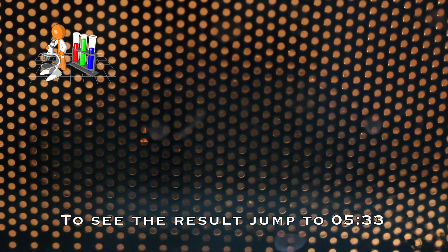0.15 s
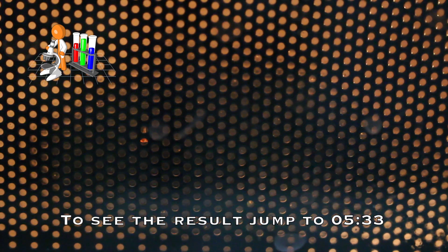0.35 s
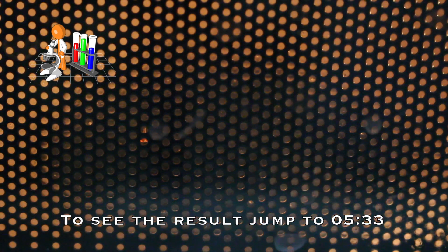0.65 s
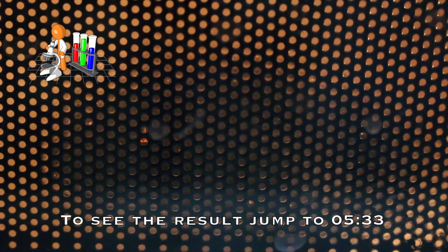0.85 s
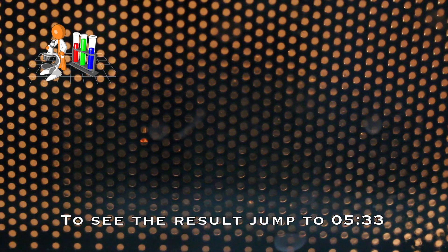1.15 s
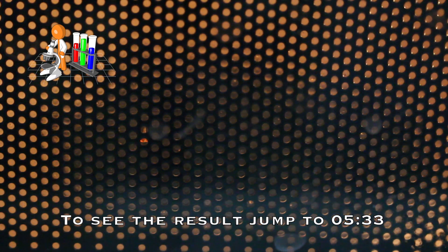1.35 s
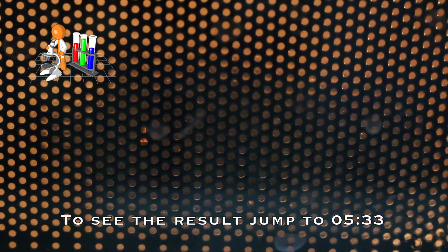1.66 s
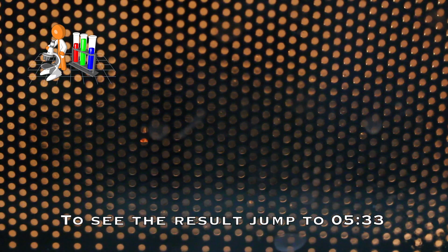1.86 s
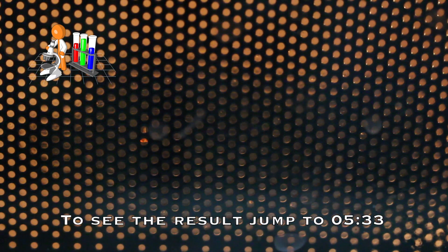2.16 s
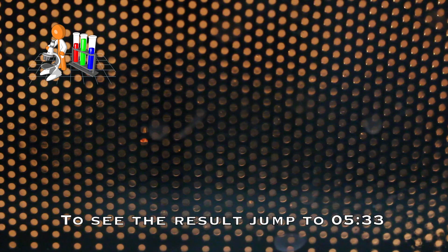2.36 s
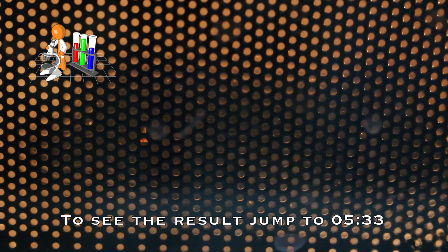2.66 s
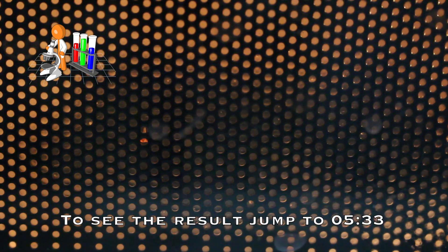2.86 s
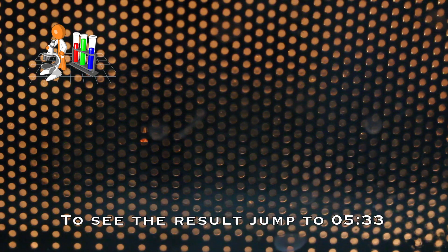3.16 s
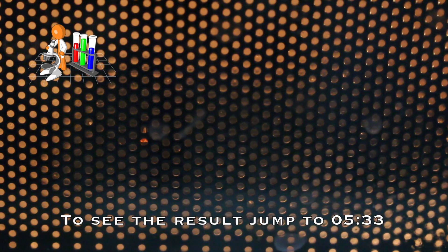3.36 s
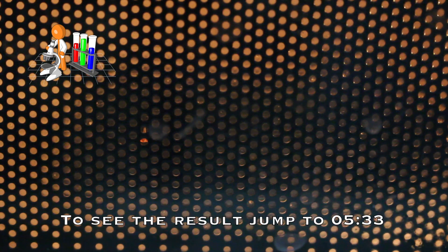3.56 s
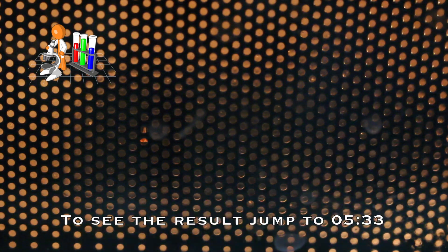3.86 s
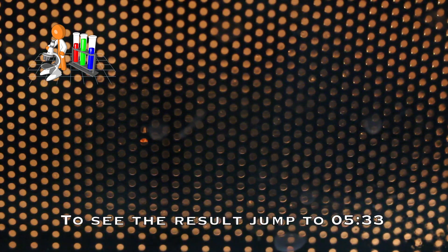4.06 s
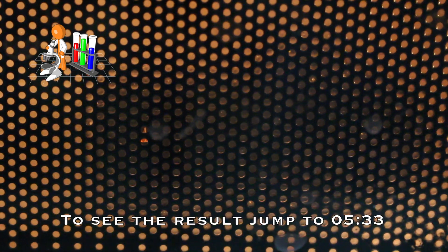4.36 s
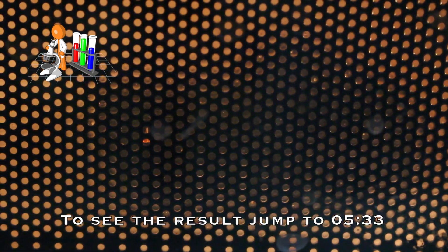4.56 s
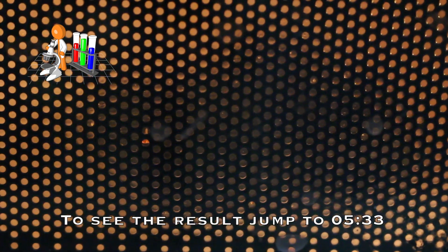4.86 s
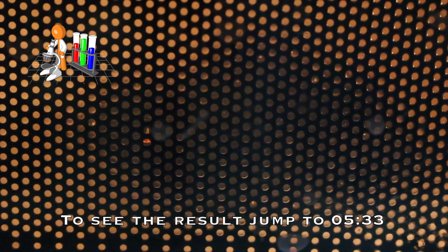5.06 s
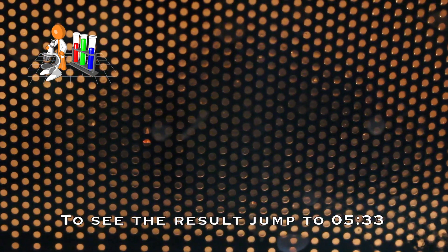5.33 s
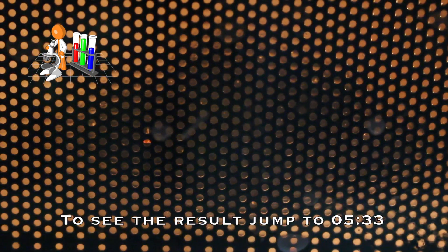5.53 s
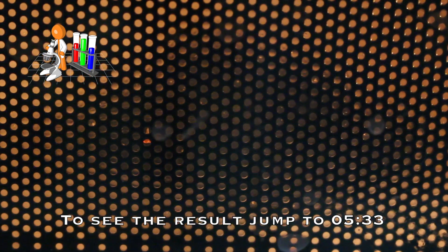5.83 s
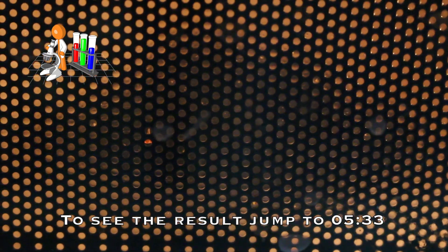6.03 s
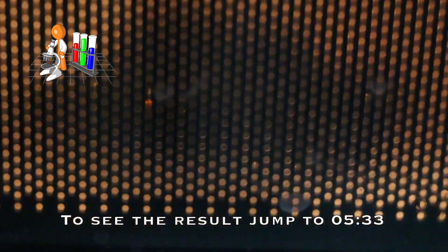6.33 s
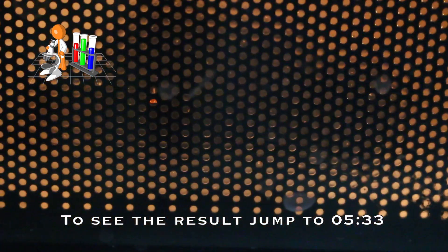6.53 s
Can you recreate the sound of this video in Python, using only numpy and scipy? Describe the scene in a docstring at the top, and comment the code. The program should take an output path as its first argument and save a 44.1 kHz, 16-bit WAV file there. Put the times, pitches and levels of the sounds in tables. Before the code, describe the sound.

A microwave oven is already running at 0 seconds and continues to the end, about 6.6 seconds, heard in stereo from right at its door. A deep mains hum with buzzing overtones throbs four to five times a second against the motor's tone, the throb slowly growing deeper and shallower. The fan whirs in steady low blade tones, with a wavering whistle near 935 hertz and a dull, boxy rush of air. Very faint, rapid high ticks from the turntable drive come in clusters. Around 5 seconds the whistle swells modestly, then recedes. From 5.8 to 6.3 seconds an extremely faint, narrow hiss of vapour glides upward and back down. At about 6.37 seconds several contacts within milliseconds merge into one loud, sharp snap against the door, with a quickly damped metallic ring and a short kitchen tail. The hum continues underneath.

```python
"""A microwave oven runs, heard from right at its door. From the start the transformer hums on the mains and
throbs against a motor turning just under mains speed; the fan whirs as blade tones over a rush of air, and
the turntable drive ticks faintly. Around 5 s the fan's whistle swells. At 5.8 s a thin jet of vapour hisses,
its pitch rising and falling with pressure. At about 6.4 s something snaps sharply against the door:
a few quick contacts make it ring, with a short tail from the kitchen."""
import sys
import numpy as np
from scipy import signal
from scipy.fft import rfft, irfft, next_fast_len
from scipy.io import wavfile
from scipy.ndimage import map_coordinates

SR = 44100
rng = np.random.default_rng(int(sys.argv[2]) if len(sys.argv) > 2 else 0)


def transcribe(u):
    """Save the signal u as a 16-bit wav file named by the first command-line argument.

    u: samples, shape (n,) or (channels, n), limited to [-1, 1]; the rate is SR.
    q: integer samples, one column per channel.
    """
    v = np.clip(np.atleast_2d(u).T, -1, 1)
    q = np.round(v * 32767).astype(np.int16)
    wavfile.write(sys.argv[1], SR, q)


N = 295029
TIME = np.arange(N) / SR  # seconds

MAINS_HZ, MOTOR_HZ, FAN_HZ = 59.97, 57.71, 46.773  # mains cycles, motor turns and fan turns a second
GEAR_HZ = 18.6  # turns a second of a gear in the turntable drive
THROB_LOW_S = 0.04  # a moment when the main hum and the motor's throb oppose each other
THROB_DB = -27.5  # mean rms of the motor's tone at twice its turning rate
SAG_S, SAG_PERIOD_S = 1.74, 1.7  # a moment when that tone is weakest, and the time between such moments
SAG_DB, RIPPLE_DB = 1.5, 0.8  # depth either way of the sag, and of a ripple that adds a lesser dip halfway
WHISTLE_DB, WHISTLE_RISE_DB = -47.5, 4  # the fan's 20th multiple: usual rms, and its one swell
WHISTLE_CREST_S, WHISTLE_WIDTH_S = 5.0, 0.9  # middle and half width of that swell
JET_START_S, JET_LENGTH_S, JET_DB = 5.8, 0.49, -64  # the puff of vapour, with its rms at full pressure
JET_LOW_HZ, JET_RISE_HZ = 8300, 3600  # its pitch at no pressure, and the rise at full pressure
TOP_HZ = 15720  # upper edge of the sound

# Tones of the transformer: (multiple of the mains, level/dB rms, left over right/dB)
HUM_TONES = [(1, -56, -1.2), (2, -28.5, -1.5), (3, -43.5, -0.5), (4, -29.5, -1.2), (5, -55.5, 2.5),
             (6, -32, -1), (8, -38.5, 0), (10, -44.5, -3.5), (12, -48.5, 5.5), (14, -53.5, 11.5),
             (16, -59.5, -4), (18, -51, -3.5), (20, -54.5, 4.5), (22, -52.5, 1), (26, -51, 3),
             (28, -54.5, 3.5), (49, -67, -4.5), (77, -81.5, 3.5)]
# Colour of the buzzing sheet metal: (f/Hz, relative level/dB)
BUZZ_COLOUR = [(600, -39), (1200, -10.0), (2600, -1.0), (4000, -5), (6000, -13.5), (10000, -38.5)]
# Strength of the motor's shake, once a turn: (t/s, level/dB rms)
MOTOR_SHAKE = [(0.0, -44), (0.86, -50), (1.08, -35), (2.64, -42), (2.7, -52), (2.87, -37), (3.37, -34),
               (4.04, -41), (4.1, -49), (4.9, -32.5), (5.35, -32.5), (6.24, -54), (6.5, -38), (6.69, -48)]
# Tones of the four fan blades: (multiple of the shaft's turning, level/dB rms, left over right/dB)
BLADE_TONES = [(1, -58.5, 0.5), (2, -51, -0.5), (4, -29, -1.6), (8, -47.5, 2), (9, -63.5, -0.5),
               (12, -42.5, 1.5), (16, -52, -7)]
# Rush of air from the fan: (f/Hz, relative level per Hz/dB)
AIR_RUSH = [(22, -30.5), (35, -31), (60, -13.5), (130, -0.74), (300, 0.5), (480, -17), (700, -15.5),
            (1300, -17.5), (2500, -14.5), (3600, -22), (5000, -33.5), (7000, -41), (10000, -48),
            (15500, -58)]
# Resonances and dips of the case: (f/Hz, width/Hz, boost or cut/dB)
CASE_RESONANCES = [(86, 4, 4.5), (101, 6, -8), (163.6, 10.2, -10.5), (199, 32, 2.5), (216.4, 17, -7),
                   (251, 17, -4), (326, 23, 2), (457.4, 79.5, 12.5), (513, 11, 7), (593, 67, 12.5),
                   (930, 170, 7), (1227, 177, -5), (1298, 320, 10), (1547, 99, 2), (1888, 136, 5.5),
                   (2203, 23, 8.5), (2825, 130, -4), (8094, 270, 2)]
# How alike the rush is at the two ears: (f/Hz, likeness, 1 = the same and 0 = unrelated)
EAR_LIKENESS = [(100, 0.94), (300, 0.98), (600, 0.87), (1300, 0.77), (2600, 0.66), (5000, 0.66), (9000, 0),
                (15000, 0)]
# Which side the rush leans to: (f/Hz, left over right/dB)
RUSH_LEAN = [(100, -2.2), (300, 1), (700, -3.5), (1400, -0.2), (2800, .7), (5500, -0.5), (12000, -.8)]
# Contacts that make up the one snap: (t/s, relative level/dB)
SNAP_CONTACTS = [(6.3695, -12.5), (6.371, -11.5), (6.3722, -9), (6.3754, -15.5)]
# Ringing tones of the door: (f/Hz, relative level/dB, time to fade by 60 dB/s)
DOOR_MODES = [(650, -9, .028), (820, -9, 0.025), (1040, -7, .019), (1490, -4, 0.029), (1800, -3, .02),
              (2080, -4, 0.021), (2790, -1.5, 0.012), (3110, -3, .012), (3890, -1.5, 0.013),
              (4530, -1.5, 0.0075), (6080, -1, 0.0055)]
# Colour of the snap: (f/Hz, boost or cut/dB)
SNAP_COLOUR = [(200, -9), (700, 4.5), (4500, 1.5), (5400, -2.5), (6500, 1.5), (7400, 2), (8500, -8),
               (13000, -21), (15000, -33)]
# Fading of the kitchen's tail: (f/Hz, time to fade by 60 dB/s)
KITCHEN_FADE = [(200, .35), (2000, 0.56), (7000, 0.45), (14000, 0.32)]


def amp(db):
    """Turn decibels into a gain."""
    return 10 ** (np.asarray(db) / 20)


def unit(x):
    """Scale to rms 1."""
    return x / np.sqrt(np.mean(x ** 2) + 1e-20)


def along(points, hz):
    """Read a table of (f/Hz, value) between its points, on a log frequency axis."""
    f, v = np.transpose(points)
    return np.interp(np.log(hz + 1), np.log(f + 1), v)


def wobble(rate):
    """A smooth random curve through `rate` random points a second."""
    points = rng.standard_normal(int(N * rate / SR) + 4)
    return map_coordinates(points, [TIME * rate], mode="nearest")


def cycle_of(crest_s, period_s):
    """A slow cosine that is 1 at crest_s and again every period_s."""
    return np.cos(2 * np.pi * (TIME - crest_s) / period_s)


def filtered(x, response):
    """Shape the spectrum of x by a gain that depends on frequency."""
    m = next_fast_len(N + SR // 2)
    spectrum = rfft(x, m) * response(np.fft.rfftfreq(m, 1 / SR))
    return irfft(spectrum, m)[..., :N]


def band(centre_hz, width_hz):
    """Stereo noise of rms 1 in one narrow band."""
    noise = rng.standard_normal((2, N))
    return unit(filtered(noise, lambda hz: 1 / (1 + ((hz - centre_hz) / width_hz) ** 2)))


def panned(x, lean_db):
    """Make left stronger than right by lean_db."""
    return x * amp(np.array([[.5], [-.5]]) * lean_db)


def tones(turns, orders, flutter_db):
    """Add up multiples of one rotation; the higher ones waver more in level."""
    out = np.zeros((2, N))
    for order, db, lean_db in orders:
        k = round(order)
        waver = flutter_db * np.sqrt(min(k, 20)) * wobble(3.93)
        # the case shifts the low multiples by a smooth law and scatters the high ones
        shift = k ** 2 / 16 + rng.random() * (k > 10)
        tone = np.sqrt(2) * np.sin(2 * np.pi * (k * turns + shift))
        out += panned(amp(db + waver) * tone, lean_db)
    return out


def transformer():
    """The core hums on mains multiples; loose sheet metal adds a faint comb of high ones."""
    turns = MAINS_HZ * (TIME - THROB_LOW_S)
    # one random mains cycle per ear, repeated over and over
    cycles = rng.standard_normal((2, round(SR / MAINS_HZ)))
    comb = np.array([np.interp(turns, np.arange(len(c)) / len(c), c, period=1) for c in cycles])
    buzz = unit(filtered(comb, lambda hz: amp(along(BUZZ_COLOUR, hz))))
    buzz_level = amp(-50.0 + 0.8 * wobble(2.8))
    return tones(turns, HUM_TONES, flutter_db=0.35) + buzz_level * buzz


def motor():
    """The rotor slips behind the mains, so its tone at twice its rate beats with the hum 4 or 5 times a second."""
    angle = 2 * np.pi * (MOTOR_HZ * (TIME - THROB_LOW_S) + 0.006 * wobble(3))
    shake = amp(np.interp(TIME, *np.transpose(MOTOR_SHAKE))) * np.sin(angle)
    sag = SAG_DB * cycle_of(SAG_S, SAG_PERIOD_S)
    ripple = RIPPLE_DB * cycle_of(SAG_S, SAG_PERIOD_S / 2)
    throb = -amp(THROB_DB - sag - ripple) * np.cos(2 * angle)
    overtone = amp(-44 + 2 * wobble(3)) * np.sin(4 * angle)
    return panned(np.sqrt(2) * (shake + throb + overtone), -1.4)


def case_db(hz):
    """The metal case boosts some frequencies and weakens others."""
    return sum(db / (1 + (2 * (hz - centre) / width) ** 2) for centre, width, db in CASE_RESONANCES)


def air_rush():
    """Air noise coloured by the case, pulsing a little at twice the mains rate; scaled to rms 1."""
    pulsing = 1 + 0.038 * np.cos(2 * np.pi * 2 * MAINS_HZ * TIME)

    def shared_and_opposed(hz):
        # the more alike the ears, the more goes to the shared part
        mix = np.arccos(np.clip(along(EAR_LIKENESS, hz), -1, 1)) / 2
        return amp(along(AIR_RUSH, hz) + case_db(hz)) * [np.cos(mix), np.sin(mix)]

    mid, side = filtered(pulsing * rng.standard_normal((2, N)), shared_and_opposed)
    ears = np.array([mid + side, mid - side])
    return unit(filtered(ears, lambda hz: panned(1, along(RUSH_LEAN, hz))))


def fan():
    """The turning blades make steady tones and a whistle over the rush of the air they push."""
    turns = FAN_HZ * TIME + 0.006 * wobble(1.5) + 0.0012 * wobble(14)  # slightly uneven turning
    swell = np.exp(-((TIME - WHISTLE_CREST_S) / WHISTLE_WIDTH_S) ** 2)
    whistle_level = amp(WHISTLE_DB + WHISTLE_RISE_DB * swell + 2.4 * wobble(4.8))
    whistle = whistle_level * np.sqrt(2) * np.sin(2 * np.pi * 20 * turns)
    rush = amp(-28.0 + 0.2 * wobble(2.7)) * air_rush()
    return tones(turns, BLADE_TONES, flutter_db=0.68) + whistle + rush


def turntable():
    """A gear of the drive rubs once a turn: faint high ticks that come in clusters."""
    ticks = np.exp(3 * (np.cos(2 * np.pi * GEAR_HZ * TIME) - 1))
    clusters = amp(3.5 * np.tanh(wobble(3.4)))
    return amp(-73) * unit(ticks * clusters) * band(centre_hz=8120, width_hz=80)


def vapour():
    """A narrow hiss whose pitch and strength follow one arch of pressure."""
    pressure = np.sin(np.pi * np.clip((TIME - JET_START_S) / JET_LENGTH_S, 0, 1))
    hiss = band(centre_hz=0, width_hz=600)
    # multiplying the low noise by a gliding tone lifts it to that pitch
    pitch_hz = JET_LOW_HZ + JET_RISE_HZ * pressure
    glide = np.sqrt(2) * np.cos(2 * np.pi * np.cumsum(pitch_hz) / SR)
    return amp(JET_DB) * np.abs(pressure) ** 1.3 * hiss * glide


def door_ring(t):
    """The struck door rings in fading tones, each with its own random phase at each ear."""
    return sum(amp(level - 60 * t / t60) * np.sin(2 * np.pi * (hz * t + rng.random((2, 1))))
               for hz, level, t60 in DOOR_MODES)


def snap():
    """A few contacts within milliseconds crack against the door and make it ring."""
    out = np.zeros((2, N + SR))
    t = np.arange(SR // 4) / SR
    for contact_s, db in SNAP_CONTACTS:
        ring = door_ring(t)
        # a short crack, then the diffuse ring of the metal cavity
        fading = amp(-3.5 - 60 * t / 0.007) + amp(-26.5 - 60 * t / 0.3)
        crack = fading * rng.standard_normal((2, len(t)))
        start = round(contact_s * SR)
        out[:, start:start + len(t)] += amp(db - 6.5) * (ring + crack)
    return filtered(out[:, :N], lambda hz: amp(along(SNAP_COLOUR, hz)))


def kitchen(x):
    """The room adds a short diffuse tail, different at each ear: noise fading at a rate set by pitch."""
    hz, t, z = signal.stft(rng.standard_normal((2, SR // 2)), SR, nperseg=256)
    fade = amp(-60 * t / along(KITCHEN_FADE, hz)[:, None])
    tail = signal.istft(z * fade, SR, nperseg=256)[1]
    return signal.fftconvolve(x, tail / np.linalg.norm(tail[0]), axes=1)[:, :N]


def scene():
    """The running oven, with the hiss and the snap on top; only the snap gets a kitchen tail."""
    oven = transformer() + motor() + fan() + turntable()
    hiss = vapour()
    click = snap()
    return oven + hiss + click + amp(-13.5) * kitchen(click)


def record(dry):
    """A steep low-pass, run forwards and backwards, removes nearly everything above TOP_HZ."""
    low_pass = signal.ellip(10, .05, 80, TOP_HZ, fs=SR, output="sos")
    return signal.sosfiltfilt(low_pass, dry)


dry = scene()
out = record(dry)
transcribe(out)
```